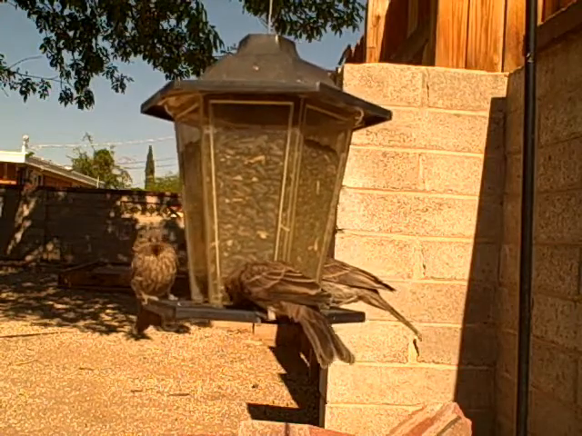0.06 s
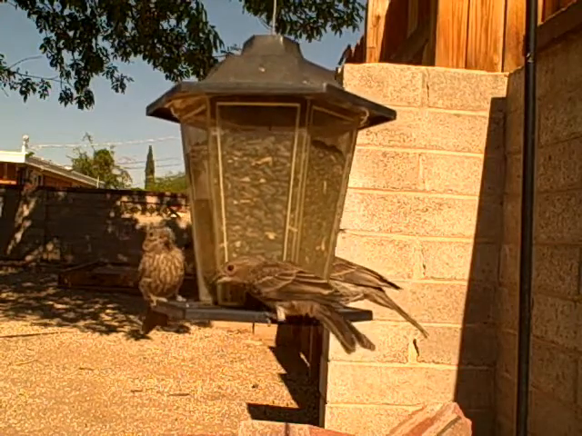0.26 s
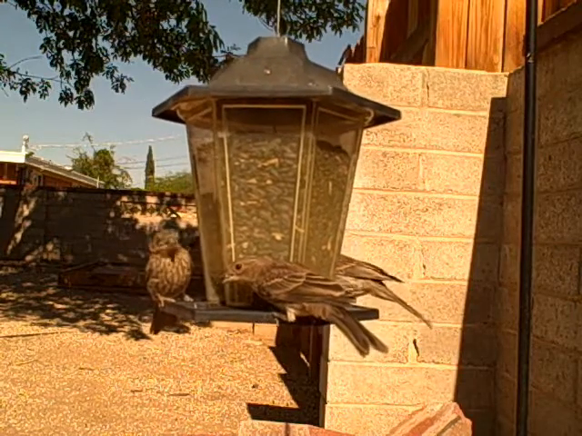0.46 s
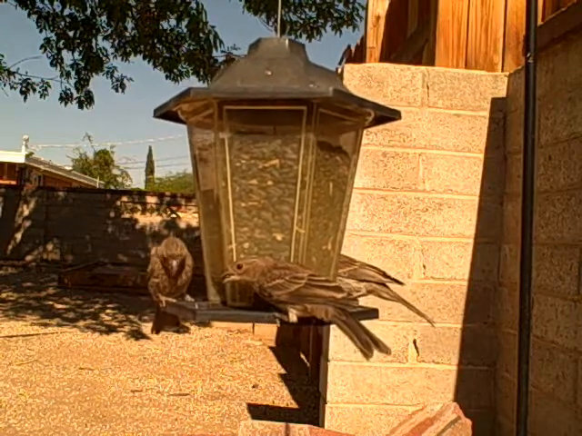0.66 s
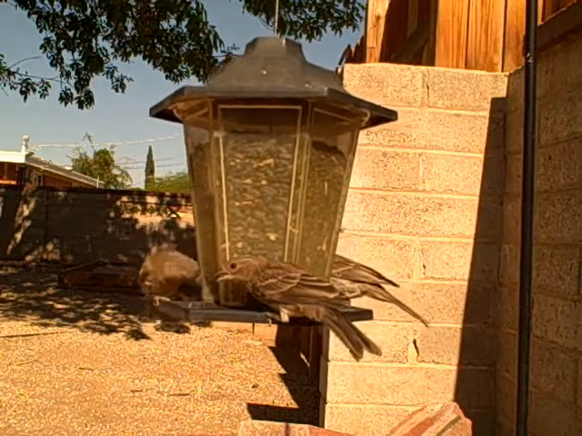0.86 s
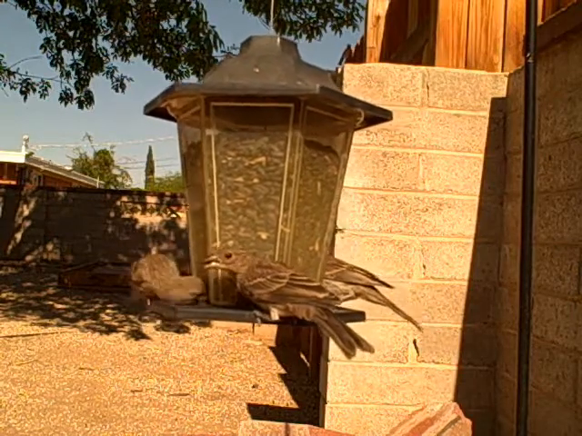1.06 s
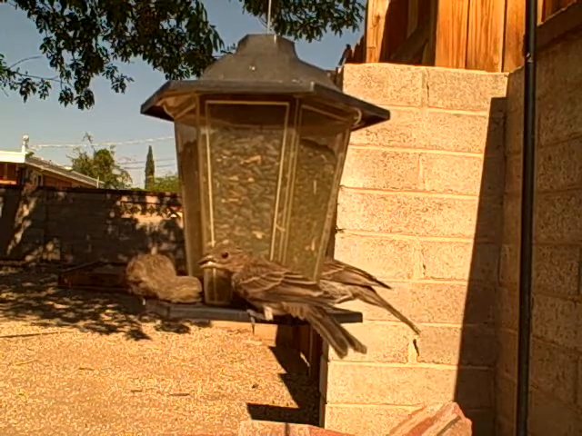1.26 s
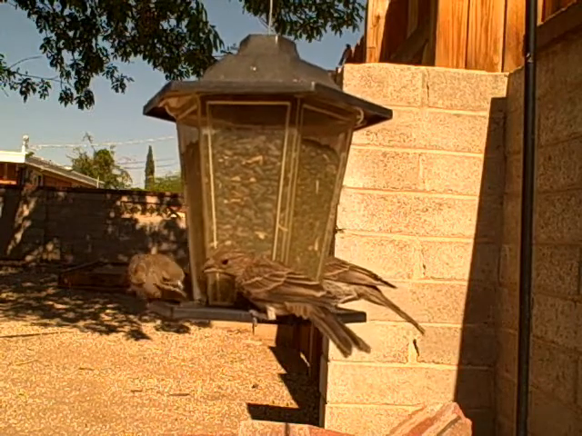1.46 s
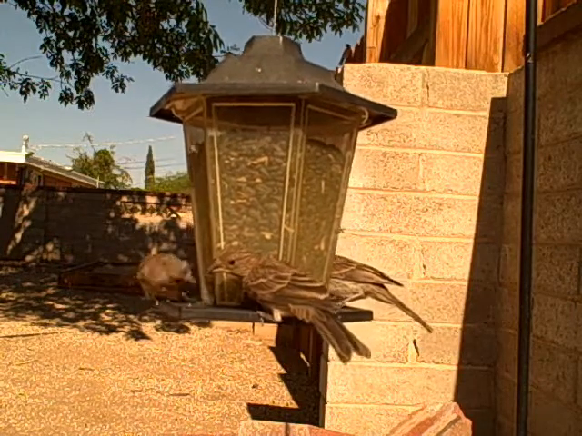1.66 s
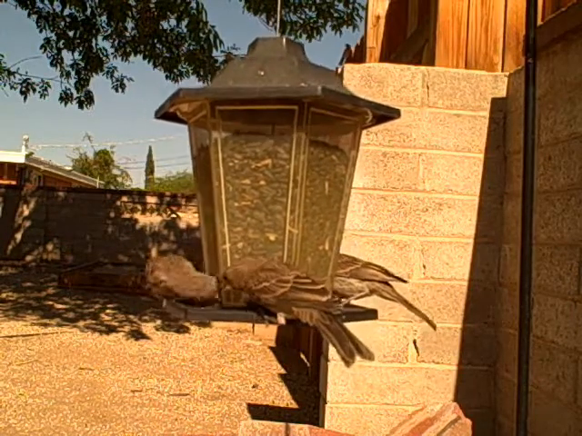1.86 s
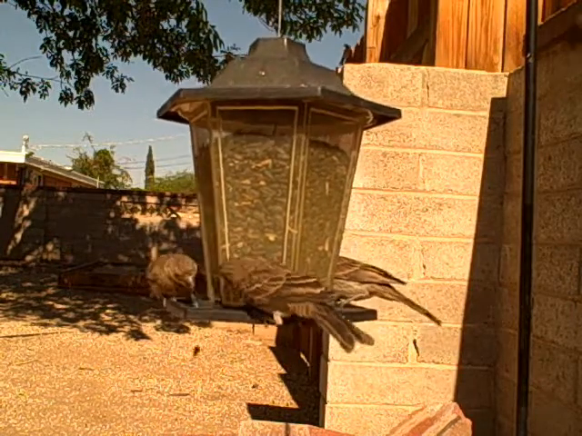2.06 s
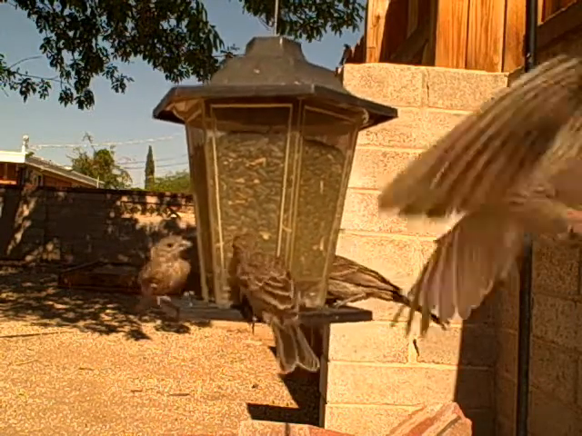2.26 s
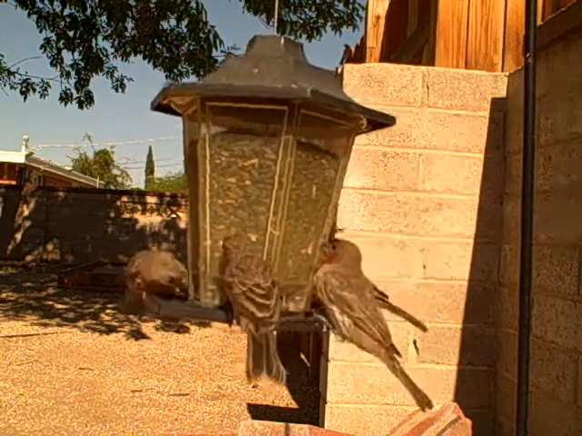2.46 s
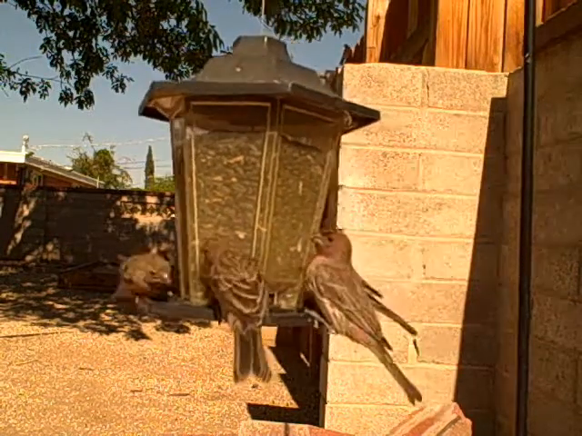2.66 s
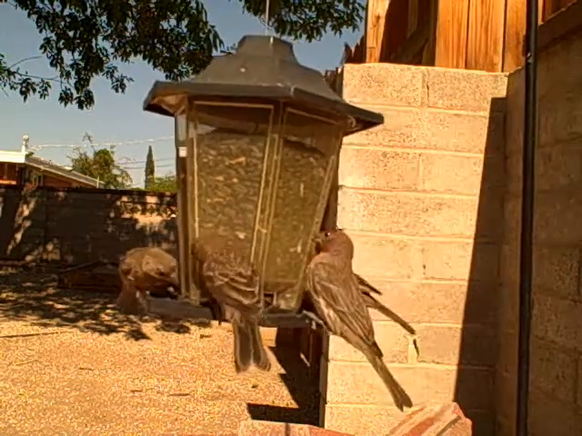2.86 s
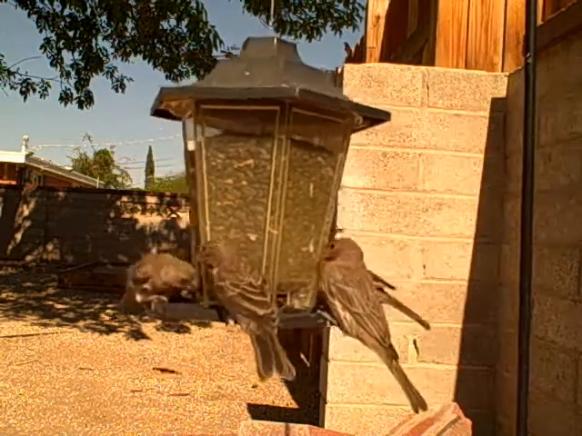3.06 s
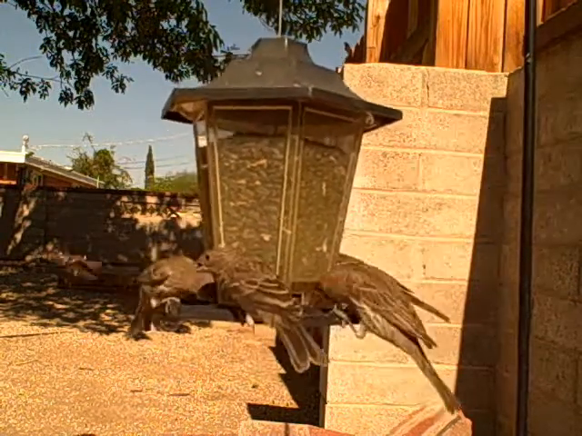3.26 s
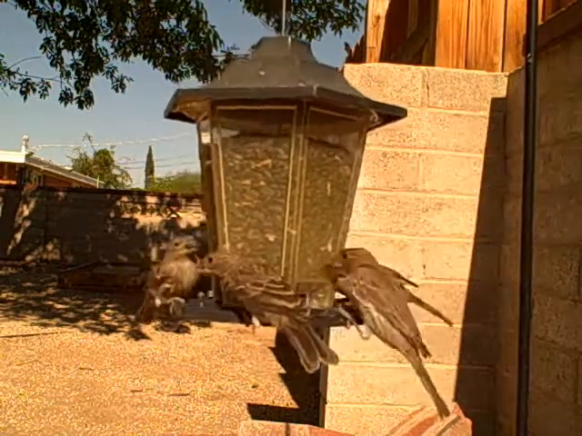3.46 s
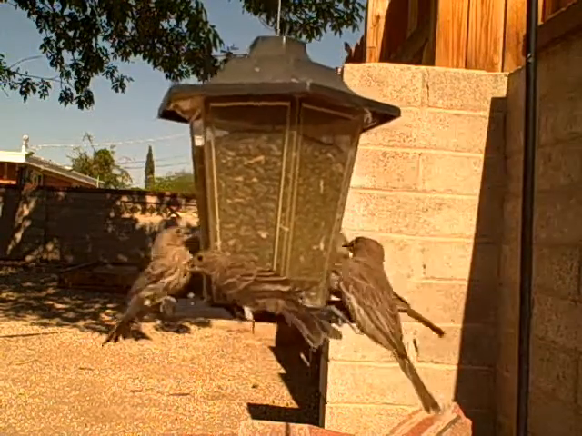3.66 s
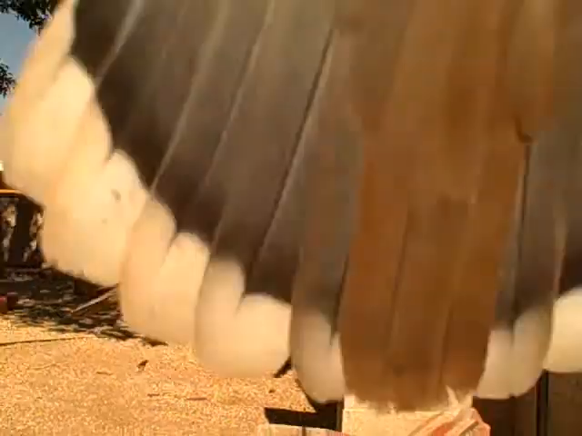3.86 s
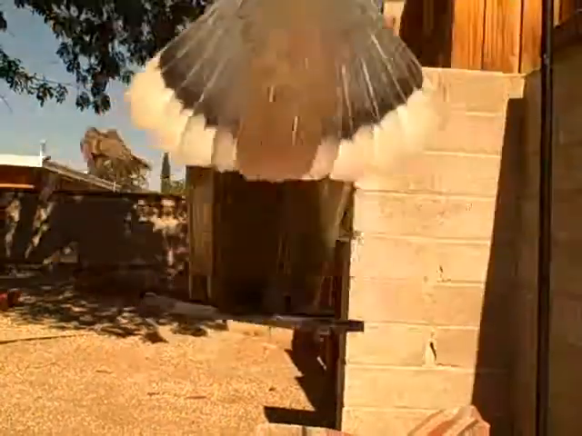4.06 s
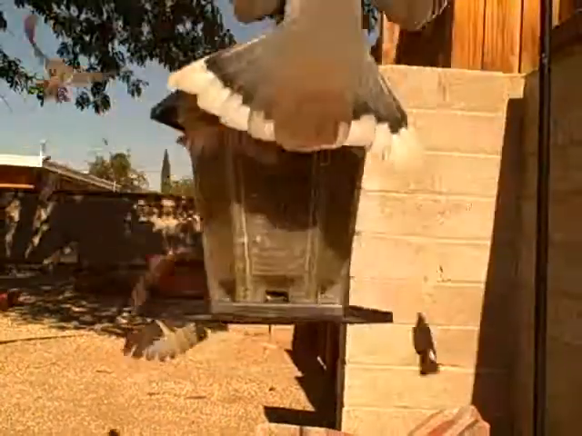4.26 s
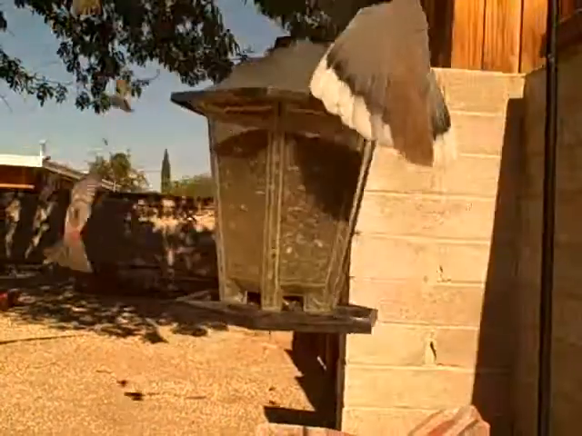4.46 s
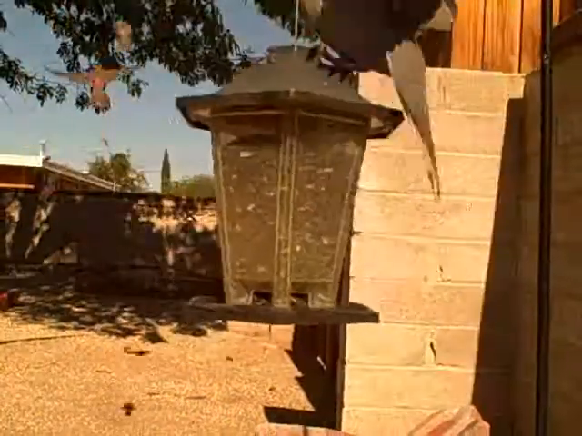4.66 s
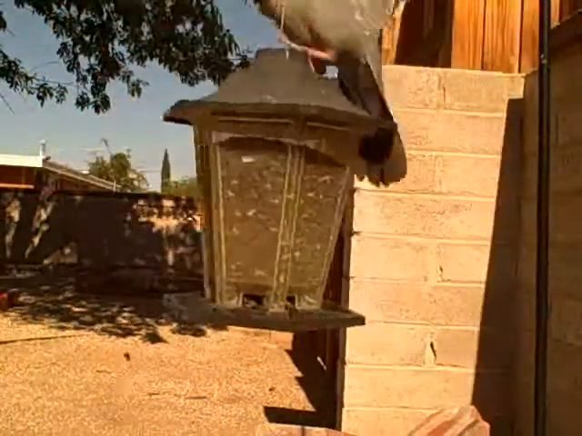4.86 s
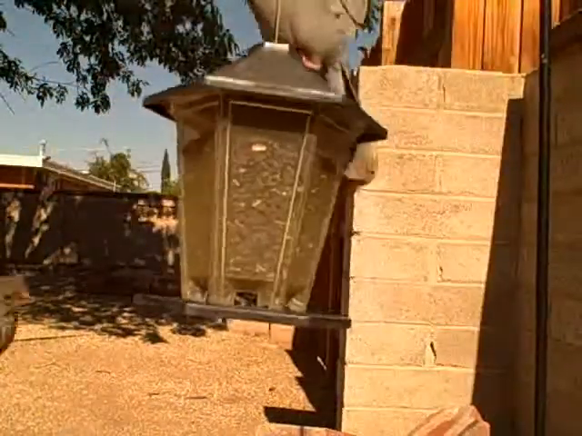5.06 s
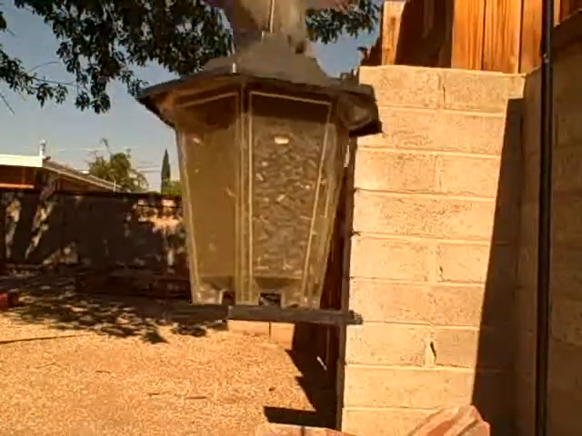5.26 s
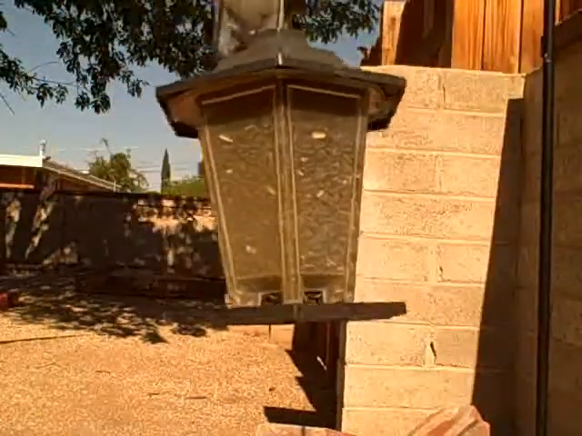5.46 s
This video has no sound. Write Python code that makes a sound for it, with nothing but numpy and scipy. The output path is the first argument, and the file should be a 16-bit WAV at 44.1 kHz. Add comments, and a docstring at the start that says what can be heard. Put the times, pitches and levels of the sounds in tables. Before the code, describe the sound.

Small birds flutter and chirp close by at a feeder before a big bird's wing blast overloads the microphone, leaving knocks, ticks and distant chips.

```python
"""Dove landing at a finch feeder

In a walled yard finches chirp, crack seeds and flutter close by at a hanging plastic feeder.
A dove beats up past the microphone, its downdraught overloading it, and lands on the lid.
Another dove coos far off over the hum of the neighbourhood. Calls are gliding tones, wings are shaped
noise and air pushes, ticks and knocks are short rings; the walls return a sparse tail."""
import sys
import numpy as np
from scipy import signal
from scipy.fft import rfft, irfft
from scipy.io import wavfile
from scipy.ndimage import uniform_filter1d

SR = 44100
rng = np.random.default_rng(int(sys.argv[2]) if len(sys.argv) > 2 else 0)


def waveform_to_disk(signal):
    """Save audio, clipped to [-1, 1], as 16-bit WAV at the path in sys.argv[1]."""
    frames = np.transpose(np.atleast_2d(signal))
    scaled = np.clip(frames, -1, 1) * 32767
    samples = np.round(scaled).astype(np.int16)
    wavfile.write(sys.argv[1], SR, samples)


N = 243873


def gain_of(db):
    """Turns dB into gain."""
    return 10 ** (np.asarray(db) / 20)


def evened(x):
    """Scales a signal to rms 1."""
    return x / np.sqrt(np.mean(x ** 2) + 1e-20)


def read(points, hz):
    """Looks up a curve on a log-frequency axis."""
    f, value = np.transpose(points)
    return np.interp(np.log(hz + 1), np.log(f + 1), value)


def add(mix, s, sound):
    """Mixes a sound in from time s, in place."""
    part = mix[round(s * SR):][:len(sound)]
    part += sound[:len(part)]
    return mix


def columns(rows):
    """Gives the start time, and every other column of a curve sample by sample."""
    s, *rest = np.transpose(rows)
    t = np.arange(s[0], s[-1], 1 / SR)
    return s[0], [np.interp(t, s, c) for c in rest]


def level(rows):
    """Gain over the whole scene from (time [s], level [dB]) rows, silent outside them."""
    s, db = np.transpose(rows)
    return gain_of(np.interp(np.arange(N) / SR, s, db, -200, -200))


def strokes(rows, period):
    """Even wing strokes along a curve: one row of its columns for each."""
    s, *rest = np.transpose(rows)
    t = np.arange(s[0], s[-1], period)
    return np.transpose([t, *(np.interp(t, s, c) for c in rest)])


def noise(points):
    """Noise of rms 1 with the given spectrum."""
    spectrum = rfft(rng.standard_normal(N + 1))
    shape = gain_of(read(points, np.fft.rfftfreq(N + 1, 1 / SR)))
    return evened(irfft(spectrum * shape)[:N])


def wobble(size, smooth_s):
    """Random wandering of rms 1, smoothed twice over smooth_s."""
    span = max(int(smooth_s * SR), 1)
    once = uniform_filter1d(rng.standard_normal(size), span)
    return evened(uniform_filter1d(once, span))


def band(hz, width):
    """A steep band of noise about hz."""
    return noise([(hz - 2 * width, -50), (hz - width / 2, 0), (hz + width / 2, 0), (hz + 2 * width, -50)])


# spectrum of the neighbourhood beyond the walls: (frequency [Hz], relative level [dB per Hz])
HUM_SPECTRUM = [(8.8, -32.5), (15, 6.5), (65, -2), (142, -3.5), (286, -15), (527, -15), (972, -20),
                (1380, -30), (1850, -25.5), (2330, -28.5), (3830, -34.5), (6480, -39), (8420, -38),
                (14700, -42), (16000, -54.5)]
HUM_DB = -51
WHINE_HZ, WHINE_DB = 15272, -83


def hum():
    """Distant traffic and air as shaped noise, swelling a little, and a thin steady tone."""
    tone = np.sqrt(2) * np.sin(2 * np.pi * WHINE_HZ * np.arange(N) / SR)
    swell_db = .8 * wobble(N, 0.12)
    return gain_of(HUM_DB + swell_db) * noise(HUM_SPECTRUM) + gain_of(WHINE_DB) * tone


# how long the walls ring on: (frequency [Hz], time to fall 60 dB [s])
YARD_DECAY = [(500, 0.36), (3500, 0.36), (8000, 0.25), (16000, 0.31)]
YARD_DB = -27


def yard(x):
    """The walls return a sparse tail of echoes, dying band by band."""
    taps = np.zeros(SR // 2)
    # one echo of either sign in each slot of 40 samples
    at = np.arange(400, SR // 2 - 40, 40)
    taps[at + rng.integers(0, 40, len(at))] = rng.choice([-1., 1.], len(at))
    hz, t, z = signal.stft(taps, SR, nperseg=256)
    decay = gain_of(-60 * t / read(YARD_DECAY, hz)[:, None])
    tail = signal.istft(z * decay, SR, nperseg=256)[1]
    tail = gain_of(YARD_DB) * tail / np.linalg.norm(tail)
    return signal.fftconvolve(x, tail)[:N]


# coos of the far dove:
# (start [s], length [s], nominal level [dB], start pitch [Hz], top pitch [Hz], end pitch [Hz])
COOS = [(1.793, 0.13, -51, 628, 713, 760), (1.985, 0.15, -50.5, 800, 799, 770),
        (2.523, 0.14, -55.5, 760, 757, 756), (2.907, 0.21, -49, 740, 752, 705)]
# faint husky band near 630 Hz, running under and past the coos: (time [s], level [dB])
COO_HUSK = [(1.75, -90), (1.85, -60.5), (2.9, -62), (3.3, -57.5), (3.6, -66.5), (3.7, -82)]
COO_TOP, COO_HOLD = 0.232, .65  # shares of the length where a note peaks and starts to fade
COO_ENDS_DB = -2


def coos():
    """Near-sine notes blurred by distance, with a faint husky band running under and past them."""
    out = level(COO_HUSK) * band(630, 150)
    for start, length, top_db, start_hz, top_hz, end_hz in COOS:
        ends_db = top_db + COO_ENDS_DB
        s, (hz, db) = columns([(start, start_hz, ends_db),
                               (start + COO_TOP * length, top_hz, top_db),
                               (start + COO_HOLD * length, (top_hz + end_hz) / 2, top_db),
                               (start + length, end_hz, ends_db)])
        blur = gain_of(2.9 * wobble(len(hz), 0.0063)) * signal.windows.tukey(len(hz), .3)
        turns = 2 * np.pi * np.cumsum(hz + 9 * wobble(len(hz), .008)) / SR
        add(out, s, gain_of(db) * np.sqrt(2) * blur * np.sin(turns))
    return out


# a scratchy burst as of a take-off, then wing beats a little way off:
# (time [s], nominal peak level [dB])
FAR_PUFFS = [(0.0596, -40.5), (0.0737, -38.5), (0.087, -41.5), (0.102, -43.5), (0.166, -49.5), (0.226, -42),
             (0.291, -43.5), (0.35, -46), (0.42, -45.5), (0.48, -45.5), (0.546, -44), (0.618, -42.5),
             (0.682, -44), (0.75, -43.5), (0.833, -40), (0.897, -43), (1.151, -36.5), (1.248, -34),
             (1.322, -41.5), (1.41, -38.5)]
# colour of the puffs: (frequency [Hz], relative level [dB per Hz])
FAR_FEATHERS = [(590, -37), (1000, -29), (1280, -12.5), (2560, 4.5), (3800, -9.5), (4960, -4),
                (5570, -11.5), (6630, -5.5), (7980, -20), (16000, -37)]


def far_wings():
    """Short puffs of feather noise: a scratchy burst, then wing beats a little way off."""
    puffs = np.zeros(N)
    for s, db in FAR_PUFFS:
        # 13.5 dB allows for the noise peaking above its rms
        add(puffs, s - .003, gain_of(db - 13.5) * np.hanning(round(0.024 * SR)))
    return puffs * noise(FAR_FEATHERS)


# feathers and scattering seed close by: (time [s], nominal level [dB])
RUSTLE = [(.9, -91), (1.06, -62.5), (1.65, -63.5), (1.75, -75), (1.9, -66), (2.05, -51.5), (2.12, -65),
          (2.3, -48.5), (2.8, -65), (3.3, -67.5), (3.5, -57), (3.72, -61), (3.96, -48.5), (4.3, -49),
          (5.53, -49.5)]
# beaks, husks and claws at the feeder: (time [s], nominal peak level [dB], ring pitch [Hz])
TICKS = [(1.239, -38.5, 7060), (3.525, -55.5, 5630), (3.568, -35, 6200), (3.585, -32, 3300),
         (1.446, -33.5, 4570), (1.5443, -35, 4580), (1.5711, -28.5, 15100), (1.5953, -35.5, 7600),
         (1.8034, -28.5, 6200), (1.9607, -32, 13900), (2.0285, -34.5, 12700), (2.137, -42, 13600),
         (2.138, -29, 12700), (2.177, -32.5, 10200), (4.026, -16.5, 9100), (4.055, -12, 5800),
         (4.3312, -36, 4300), (4.335, -23, 4960), (4.3406, -25, 4330), (4.379, -23, 5060),
         (4.4134, -25.5, 5700), (4.4632, -23, 14100), (4.5057, -32, 6570), (4.8026, -24, 9000),
         (4.8229, -25.5, 6450), (4.989, -32, 8100), (5.132, -28.5, 13600), (5.2164, -24.5, 4670),
         (5.2227, -25, 13900), (5.2839, -26.5, 4600), (5.3374, -30, 4500), (5.5029, -30, 5270)]


def ticks():
    """A sharp click with a short ring and crackle; smaller ones fall at random with the rustle."""
    t, out = np.arange(300) / SR, np.zeros(N)
    for (s, db, hz), grit in zip(TICKS, rng.standard_normal((len(TICKS), 300))):
        ring = .6 * np.sin(2 * np.pi * hz * t) * np.exp(-t / .0005)
        crackle = .5 * grit * np.exp(-t / .0013)
        add(out, s, gain_of(db) * (ring + crackle))
    falls = rng.random(N) < 170 / SR  # 170 a second on average
    small = falls * gain_of(3.5 * np.minimum(rng.exponential(1, N), 3))
    grain = rng.standard_normal(300) * np.exp(-t / .0004)
    return out + gain_of(2) * signal.oaconvolve(small * level(RUSTLE), grain)[:N]


# feet and seed knock the hollow feeder: (time [s], nominal level [dB])
KNOCKS = [(2.206, -41.5), (4.336, -47), (4.411, -23), (4.587, -38.5), (4.801, -39.5), (4.989, -32.5),
          (5.113, -42), (5.17, -41), (5.216, -38), (5.286, -34), (5.497, -27)]
# ringing modes of the plastic body:
# (nominal frequency [Hz], relative level [dB], time to fall 60 dB [s])
FEEDER = [(474, 3, 0.034), (345, -14, 0.08), (700, -14, 0.043), (910, -19.5, 0.13)]


def knocks():
    """Every blow rings the same plastic body, each blow's modes slightly detuned at random."""
    t, out = np.arange(3000) / SR, np.zeros(N)
    for (s, db), detunes in zip(KNOCKS, rng.standard_normal((len(KNOCKS), len(FEEDER)))):
        ring = 0
        for (hz, mode_db, t60), detune in zip(FEEDER, detunes):
            tone = np.sin(2 * np.pi * hz * (1 + 0.0465 * detune) * t)
            ring = ring + gain_of(mode_db - 60 * t / t60) * tone
        add(out, s, gain_of(db) * ring)
    return out


# hoarse squabbling squeaks: (start [s], rise [s], fall [s], nominal top level [dB],
# start pitch [Hz], top pitch [Hz], end pitch [Hz])
SQUEAKS = [(.953, .072, 0.037, -45, 890, 981, 1015), (1.083, 0.018, 0.023, -39.5, 2720, 3310, 2350)]
# resonance of the tight throat: (frequency [Hz], relative level [dB])
SQUEAK_THROAT = [(800, -11.5), (2000, -5.5), (3000, -5), (4000, -9), (5400, 6.5), (7000, -6.5),
                 (10000, -13.5), (16000, -14)]
SQUEAK_ENDS_DB = -10.5


def squeak(start, rise, fall, top_db, start_hz, top_hz, end_hz):
    """Harmonics through a tight throat, broken into irregular throbs, with air leaking past."""
    ends_db = top_db + SQUEAK_ENDS_DB
    s, (db, hz) = columns([(start, ends_db, start_hz), (start + rise, top_db, top_hz),
                           (start + rise + fall, ends_db, end_hz)])
    turns = 2 * np.pi * np.cumsum(hz * (1 + .017 * wobble(len(hz), .0012))) / SR
    voice = 0
    for k in range(1, 14):
        strength = gain_of(read(SQUEAK_THROAT, k * hz)) * (k * hz < 16000)
        voice = voice + strength * np.cos(k * turns + k ** 2)
    throb = gain_of(6 * np.clip(wobble(len(hz), .0022), -2, 1.2))
    leak = 0.59 * noise(SQUEAK_THROAT)[:len(hz)]
    return s, gain_of(db) * (evened(voice * throb) + leak) * signal.windows.tukey(len(hz), .3)


# noise around a chirp: (frequency [Hz], relative level [dB per Hz])
CHIRP_NOISE = [(400, -15), (4000, -18), (11000, -6), (16000, -19.5)]


def chirp(rows, overtones_db, rasp_db):
    """Two voices mix in the syrinx: lines one gap apart gather round each harmonic.

    rows: (time [s], level [dB], lower pitch [Hz], gap to upper voice [Hz], upper voice [dB])."""
    s, (db, hz, gap_hz, upper_db) = columns(rows)
    size = len(hz)

    def soft(curve):
        return uniform_filter1d(curve, size=260, mode="nearest")

    low = 2 * np.pi * np.cumsum(soft(hz) * (1 + .007 * wobble(size, .001))) / SR
    gap = 2 * np.pi * np.cumsum(soft(gap_hz) * (1 + 0.071 * wobble(size, 0.0014))) / SR
    up = gain_of(upper_db + 1.5 * wobble(size, 0.0027))  # the upper voice is unsteady
    # low notes lie under the throat resonance, so overtones stand out (dB per kHz below 3600 Hz)
    lift = gain_of(np.outer([11, 4], 3600 - hz) / 1000)
    lift = lift * gain_of(-9 * np.linspace(0, 1, size) ** 3 - 0.5)  # and die away in the tail
    rasp = gain_of(rasp_db * wobble(size, 0.0011))
    harmonics = [1, *(gain_of(overtones_db)[:, None] * lift)]
    out = 0
    for k, rel in enumerate(harmonics, 1):
        mix = up ** (1 / k)  # each overtone holds more of the upper voice
        # lines from one gap below the harmonic to three above
        lines = [gain_of(-25.5) * up, 1, mix,
                 gain_of(-10.5 + 8.3 * (k > 1)) * up * mix ** .4, gain_of(-18.5) * up ** 2]
        for m, strength in enumerate(lines, -1):
            phase = 2 * np.pi * rng.random()
            out = out + rel * strength * np.cos(k * low + m * gap + phase)
    # the noise is relatively stronger in louder calls
    noise_db = -15 + .4 * db.max() - .3 * (db - db.max())
    around = gain_of(noise_db) * noise(CHIRP_NOISE)[:size]
    fade = signal.windows.tukey(size, .35)
    return s, gain_of(soft(soft(db))) * (np.sqrt(2) * out * rasp + around) * fade


# short arched chips of finches farther off:
# (time of top [s], nominal level [dB], nominal top pitch [Hz], length scale [s], octave before lift [dB])
CHIPS = [(4.279, -43.5, 3560, 0.053, -0.5), (4.506, -45, 3416, 0.036, -9), (4.604, -45.5, 3680, 0.044, -4),
         (4.67, -48.5, 3490, 0.046, -23), (4.824, -46, 3630, 0.038, -12), (4.961, -45.5, 3730, 0.074, -5),
         (5.153, -46, 3730, 0.032, -16), (5.388, -49, 3690, 0.056, -19), (5.485, -53.5, 3500, 0.037, -9)]


def chip(s, db, top_hz, length, octave_db):
    """A chirp on a small arch: quick rise, longer fall."""
    arch = [(-.45, -19, .87), (0, 1.5, 0.97), (.6, -10.5, .88)]  # (share of length, rel dB, pitch factor)
    rows = [(s + u * length, db + d, f * top_hz, 520, -9) for u, d, f in arch]
    return chirp(rows, [octave_db, -22], rasp_db=2.8)


# near finch chirps: (start [s], rise [s], tail [s], nominal top level [dB], swell [dB], fall [dB],
# start pitch [Hz], knee pitch [Hz], top pitch [Hz], tail pitch [Hz], gap to upper voice before the drop [Hz],
# upper voice at knee and top [dB], octave before lift [dB], twelfth before lift [dB], rasp [dB])
CHIRPS = [(1.467, 0.036, .037, -27.5, 22, 29, 3100, 3520, 3795, 3150, 677, -9, -16.5, -27, 1.4),
          (2.275, 0.071, 0.045, -17, 23.5, 12.5, 2218, 2895, 3820, 3220, 462, -5.5, -31, -20.5, 1.2),
          (2.317, 0.083, 0.064, -31.5, 12, 10, 2227, 2820, 3720, 3540, 700, -6.5, -41, -22, 2),
          (2.458, 0.05, 0.037, -11, 22, 25.5, 2200, 3160, 3650, 3190, 554.4, -4.5, -17.5, -22, 1.5),
          (2.677, 0.051, 0.039, -10, 28, 22, 2200, 3100, 3667, 3210, 612, -5, -11.5, -21.5, 1.5),
          (3.283, 0.067, 0.067, -31.5, 21, 7.5, 2340, 2780, 3720, 3580, 616, -7, -26, -29.5, 1.3),
          (3.735, 0.062, 0.053, -36.5, 10.5, -1, 2350, 2560, 3630, 3500, 653, -4, -25, -29, 2.3),
          (4.079, 0.042, 0.047, -29, 16, 17.5, 2270, 3100, 3774, 3080, 564, 1.5, -12, -13, 2.7),
          (4.831, 0.049, 0.053, -21, 35, 22.5, 2070, 2940, 3804, 3220, 517, -8.5, -21.5, -26.5, 3)]
KNEE, SHOULDER = .42, .75  # shares of the rise time
KNEE_SWELL, SHOULDER_SWELL = 0.6, 0.83  # shares of the swell gained by then
SHOULDER_PITCH = .75  # share of the climb from knee to top
DROP_S, DROP_PITCH, DROP_FALL = .016, 0.9154, 0.36  # after the top: time, pitch factor, share of the fall
UPPER_START_DB, UPPER_DIP_DB, UPPER_END_DB = 15.5, -2, -4  # added at the start, shoulder and end
GAP_WIDENS = 1.1  # factor after the drop


def call(s, rise, tail, db, swell, fall, start_hz, knee_hz, top_hz, tail_hz, gap_hz,
         upper_db, octave_db, twelfth_db, rasp_db):
    """A chirp climbs and swells to its top, drops a step, and fades on a tail."""
    shoulder_hz = knee_hz + SHOULDER_PITCH * (top_hz - knee_hz)
    knee_db = db - (1 - KNEE_SWELL) * swell
    shoulder_db = db - (1 - SHOULDER_SWELL) * swell
    wide_hz = GAP_WIDENS * gap_hz
    top = s + rise
    rows = [(s, db - swell, start_hz, gap_hz, upper_db + UPPER_START_DB),
            (s + KNEE * rise, knee_db, knee_hz, gap_hz, upper_db),
            (s + SHOULDER * rise, shoulder_db, shoulder_hz, gap_hz, upper_db + UPPER_DIP_DB),
            (top, db, top_hz, gap_hz, upper_db),
            (top + DROP_S, db - DROP_FALL * fall, DROP_PITCH * top_hz, wide_hz, upper_db),
            (top + tail, db - fall, tail_hz, wide_hz, upper_db + UPPER_END_DB)]
    return chirp(rows, [octave_db, twelfth_db], rasp_db)


def whistle(mix, s, db, start_hz, end_hz, length, rough, overtones_db):
    """Air through the quills: a gliding, rough tone centred on s."""
    size = round(length * SR)
    hz = np.linspace(start_hz, end_hz, size) * (1 + rough * wobble(size, .0005))
    turns = 2 * np.pi * np.cumsum(hz) / SR
    overtones = np.sin(2 * turns) + 0.65 * np.sin(3 * turns)
    tone = np.sin(turns) + gain_of(overtones_db) * overtones
    return add(mix.copy(), s - length / 2, gain_of(db) * np.sqrt(2) * tone * np.hanning(size) ** 0.13)


# single short whistles, most from the near dove's wings:
# (centre [s], level [dB], start pitch [Hz], end pitch [Hz], length [s])
WHISTLES = [(4.015, -25, 926, 756, 0.017), (4.101, -30, 848, 730, 0.017), (4.206, -44, 853, 643, 0.022),
            (4.25, -50, 1120, 925.9, 0.016), (3.685, -57, 2460, 3050, 0.03), (4.71, -54, 2930, 2760, 0.01)]
# a far dove's quills sing once a stroke, swelling and then fading: (time [s], level [dB])
FAR_WHISTLE = [(.292, -74), (.42, -66.5), (1.1, -56), (1.36, -66)]
FAR_STROKE_S = .1215
# a dove hovering near the microphone sweeps a rough whistle upward on each stroke
SWEEP_START_S, SWEEP_STROKE_S, SWEEP_DB = 4.965, .0957, -52


def whistles():
    """Quills whistle singly, far off stroke by stroke, and near in upward sweeps."""
    out = np.zeros(N)
    for row in WHISTLES:
        out = whistle(out, *row, rough=0.0083, overtones_db=-13)
    for s, db in strokes(FAR_WHISTLE, FAR_STROKE_S):
        out = whistle(out, s, db, start_hz=2350, end_hz=2560, length=.075, rough=.08, overtones_db=-30)
    for s in np.arange(SWEEP_START_S, N / SR, SWEEP_STROKE_S):
        out = whistle(out, s, SWEEP_DB, start_hz=2100, end_hz=5000, length=.034, rough=.09, overtones_db=-25)
    return out


# rumble of wing draught on the microphone: (time [s], level [dB])
GUST = [(1.9, -76), (2.2, -46), (2.8, -53.5), (3.55, -51), (3.88, -35), (3.94, -14), (4.0, -11),
        (4.06, -7.5), (4.11, -15.5), (4.146, -29), (4.3, -36), (4.73, -50.5), (5.53, -45)]
# bursts of crumpling eddies from the strokes: (time [s], nominal level [dB], length before dying away [s])
SLAPS = [(3.933, -17, 0.045), (3.962, -14.5, 0.018), (3.987, -9, 0.013), (4.003, -22, 0.027),
         (4.047, -12.5, 0.0073), (4.06, -8, 0.0095), (4.079, -35, 0.02), (4.111, -33, 0.021),
         (4.222, -35.5, 0.0099)]
# colour of the eddies: (frequency [Hz], relative level [dB per Hz])
EDDIES = [(71, -64), (120, 6.5), (261, -3), (557, -13.5), (684, -24), (1050, -31.5), (2700, -36.5),
          (3310, -44), (14700, -62), (16000, -32)]


def gust():
    """Lumpy rumble at the microphone, and sharper eddies that burst in and die away."""
    rumble = level(GUST) * noise([(10, -5.5), (25, 2.5), (50, 5.5), (90, -3.5), (150, -18), (400, -61)])
    bursts = np.zeros(N)
    for s, db, length in SLAPS:
        t = np.arange(0, length + .04, 1 / SR)
        attack = np.minimum(t / 0.0046, 1)
        decay = np.exp(-np.maximum(t - length, 0) / 0.0028)
        add(bursts, s, gain_of(db) * attack * decay)
    return rumble + bursts * noise(EDDIES) * gain_of(4 * wobble(N, .0015))


# single near wing beats, most from the dove: (time of push [s], air push peak [dB],
# nominal feather swish [dB], push length scale [s], swish half-length [s])
BEATS = [(2.648, -29.5, -75, .024, 0.012), (2.694, -34, -44, 0.014, 0.01),
         (3.551, -35.5, -60, 0.059, 0.051), (3.654, -24, -55.5, 0.029, 0.022),
         (3.779, -22.5, -47.5, 0.048, 0.08), (3.893, -10.5, -40, 0.042, 0.048),
         (3.974, -2, -34, 0.046, 0.028), (4.022, -8, -36.5, 0.019, 0.037), (4.059, -5, -44, 0.0342, 0.035),
         (4.119, -15, -35.5, 0.046, 0.031), (4.238, -17.5, -58, 0.014, 0.091),
         (4.355, -29, -36, 0.03, 0.012), (4.402, -33, -40, 0.036, .011), (4.467, -32, -50, 0.027, 0.051),
         (4.653, -48, -40, 0.013, .024), (4.871, -56, -43.5, 0.015, 0.027)]
# a finch flutters down to the tray with even strokes:
# (time [s], air push peak [dB], nominal feather swish [dB])
FLUTTER = [(1.966, -33.5, -52), (2.13, -45.5, -61), (2.2, -33.5, -40.5), (2.42, -43, -56)]
FLUTTER_STROKE_S, FLUTTER_PUSH_S, FLUTTER_SWISH_S = .0445, 0.029, 0.0093
# colour of near feathers: (frequency [Hz], relative level [dB per Hz])
SWISH = [(180, -0.5), (300, -2), (494, -4), (961, -7.5), (2070, -15.5), (3890, -12), (14500, -17.5),
         (16000, -14.5)]


def near_wings():
    """Each stroke swishes, then pushes a lobe of air with suction on either side."""
    push, swish = np.zeros((2, N))
    flutter = [(*row, FLUTTER_PUSH_S, FLUTTER_SWISH_S) for row in strokes(FLUTTER, FLUTTER_STROKE_S)]
    for s, push_db, swish_db, push_s, swish_s in flutter + BEATS:
        u = np.arange(-2 * push_s, 2 * push_s, 1 / SR) / (push_s / 3.48)
        lobe = (1 - u ** 2) * np.exp(-u ** 2 / 2)
        add(push, s - 2 * push_s, gain_of(push_db) * lobe)
        # the swish peaks 16 ms ahead of the push
        add(swish, s - .016 - swish_s, gain_of(swish_db) * np.hanning(round(2 * swish_s * SR)))
    rustle = level(RUSTLE) * gain_of(2.6 * wobble(N, .007))
    feathers = noise(SWISH) * gain_of(1.74 * wobble(N, 0.00039))
    return push + (swish + rustle) * feathers


def scene():
    """All sources; voices, whistles, ticks and knocks echo in the yard."""
    echoing = ticks() + knocks() + whistles() + coos()
    for play, rows in [(squeak, SQUEAKS), (chip, CHIPS), (call, CHIRPS)]:
        for row in rows:
            add(echoing, *play(*row))
    return (hum() + echoing + yard(echoing) + far_wings() + gust() + near_wings())[None]


EDGE_HZ = 15900


def record(dry):
    """The microphone input clips at full scale; then a low-pass limits the band."""
    clipped = np.clip(dry, -1, 1)
    lowpass = signal.firwin(511, EDGE_HZ, window=("kaiser", 9), fs=SR)
    return signal.oaconvolve(clipped, lowpass[None], "same")


dry = scene()
out = record(dry)
waveform_to_disk(out)
```